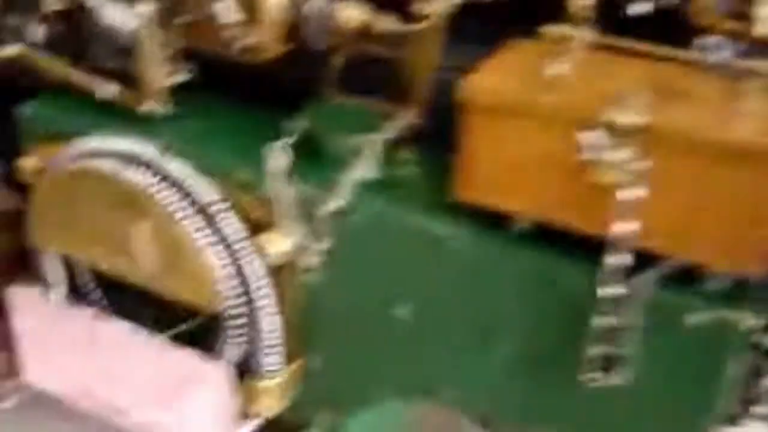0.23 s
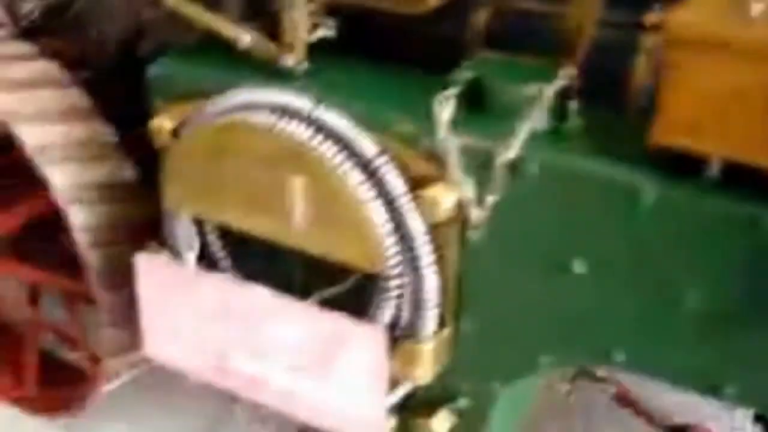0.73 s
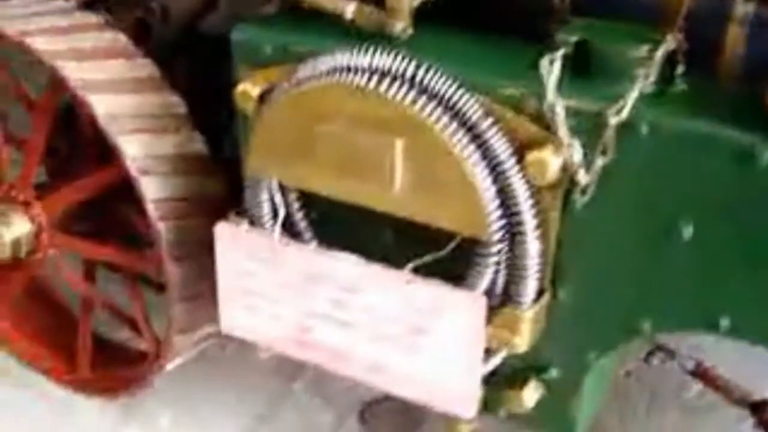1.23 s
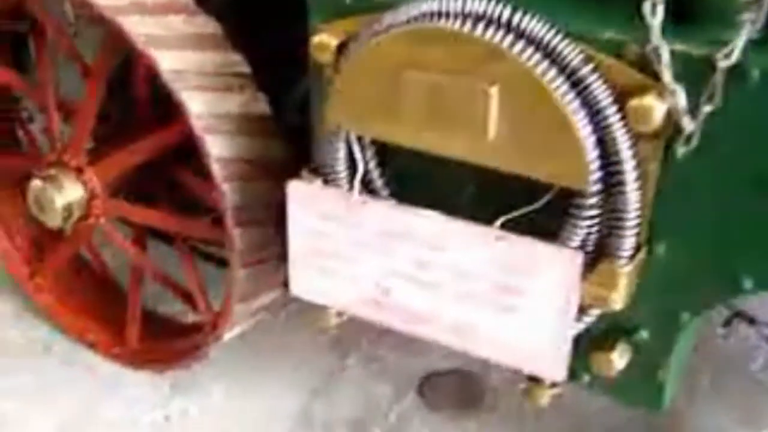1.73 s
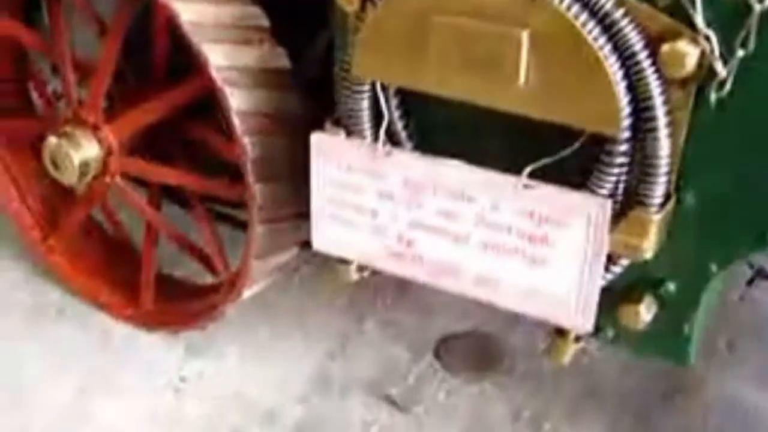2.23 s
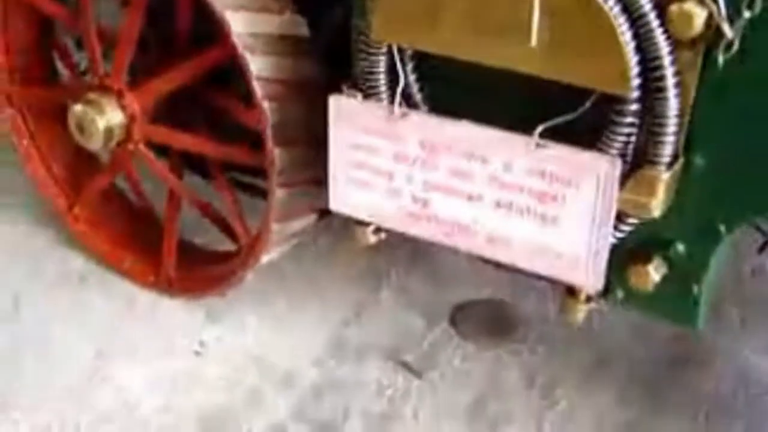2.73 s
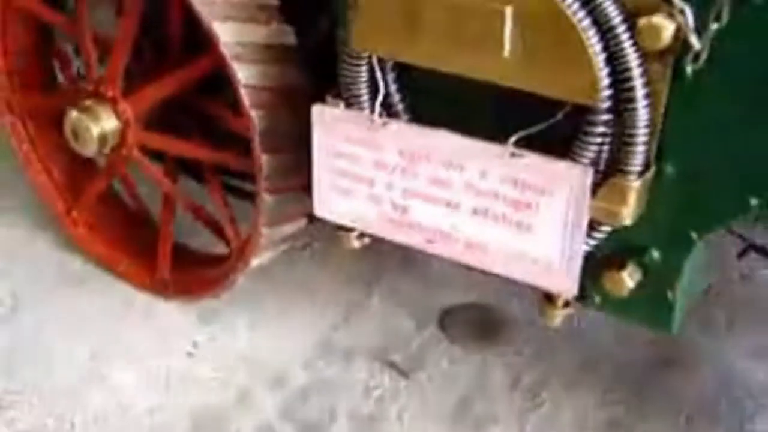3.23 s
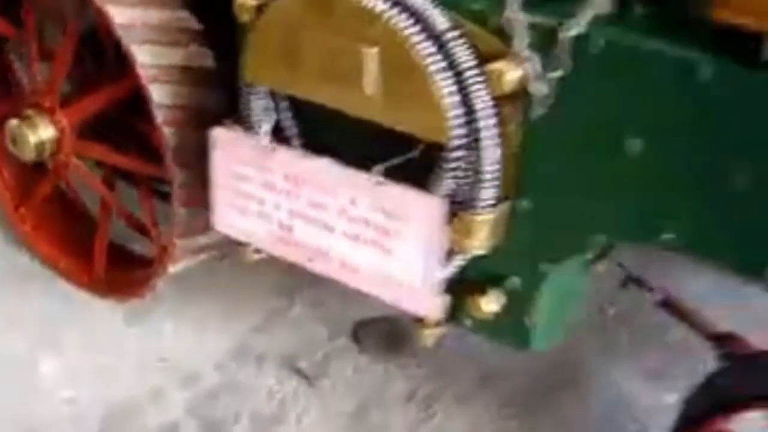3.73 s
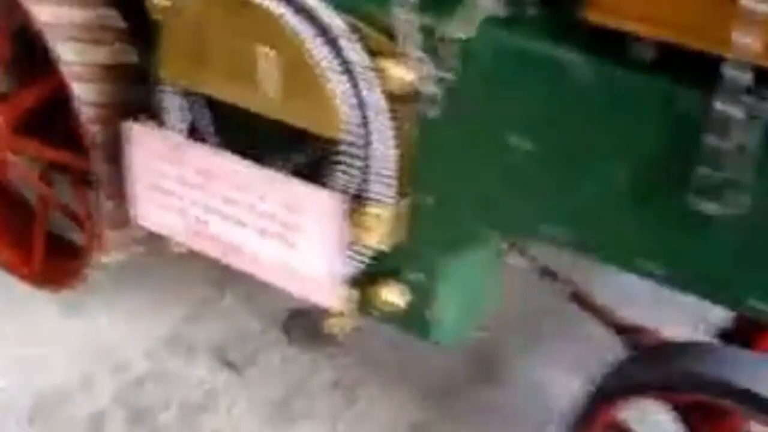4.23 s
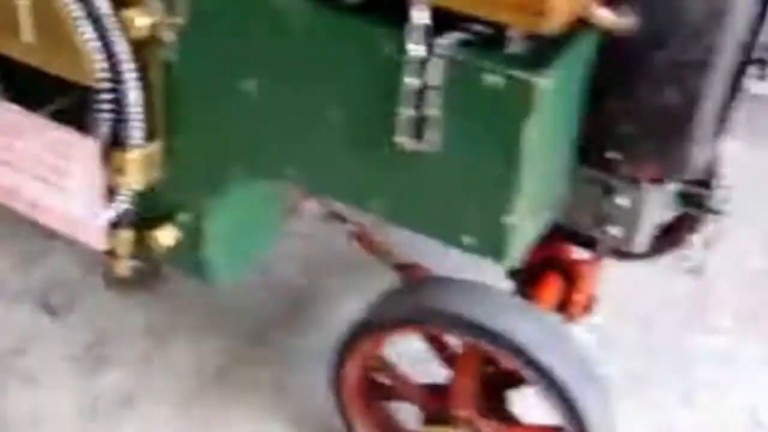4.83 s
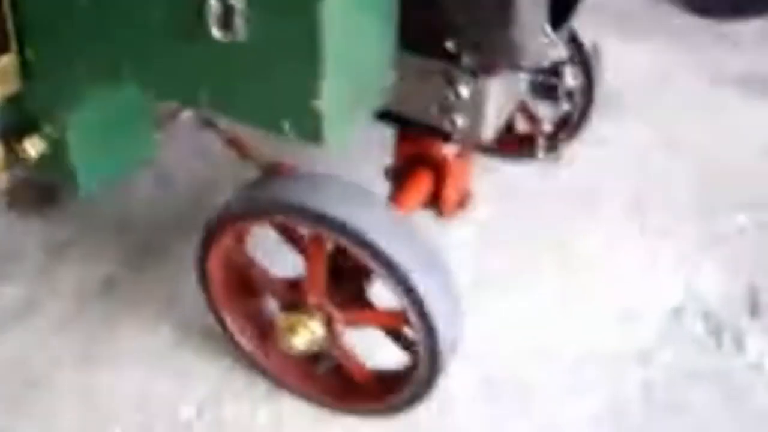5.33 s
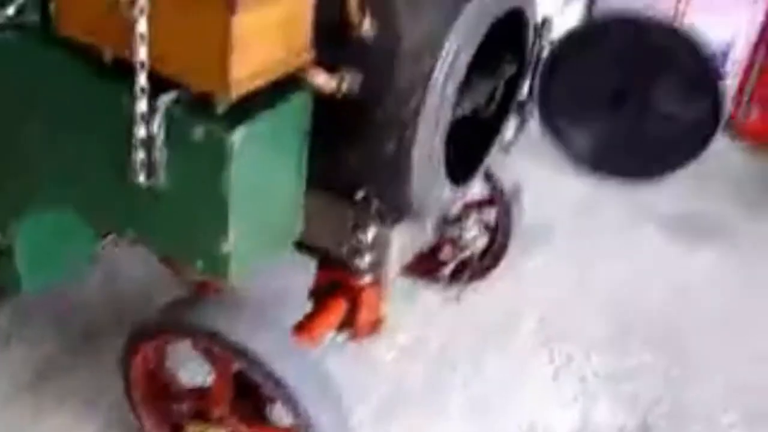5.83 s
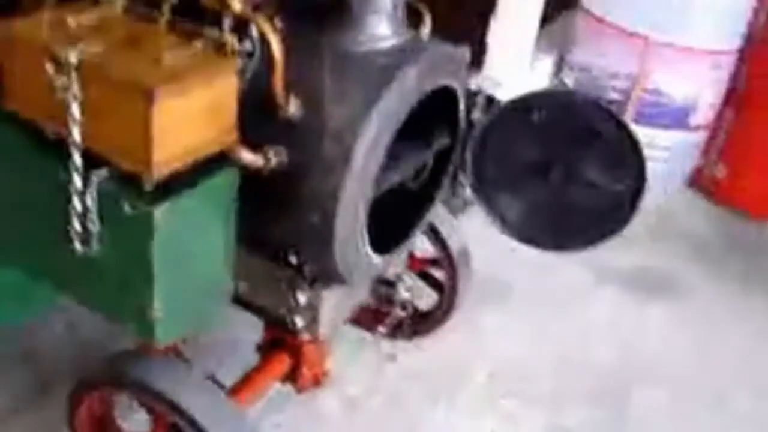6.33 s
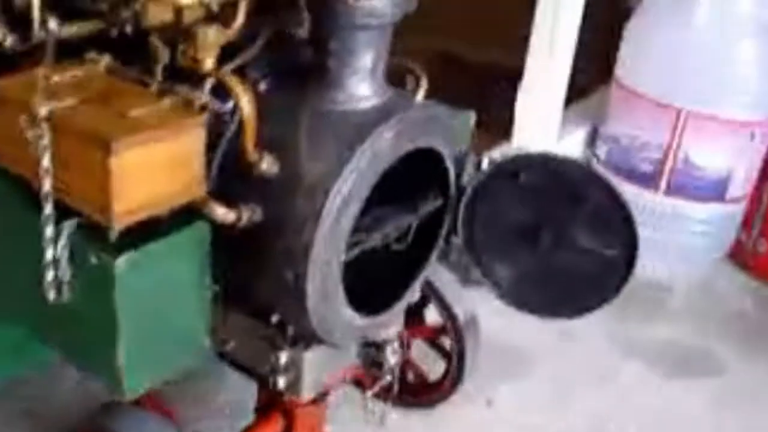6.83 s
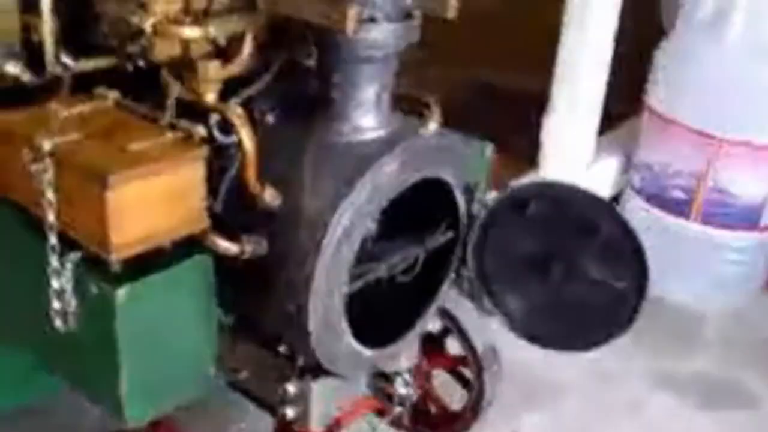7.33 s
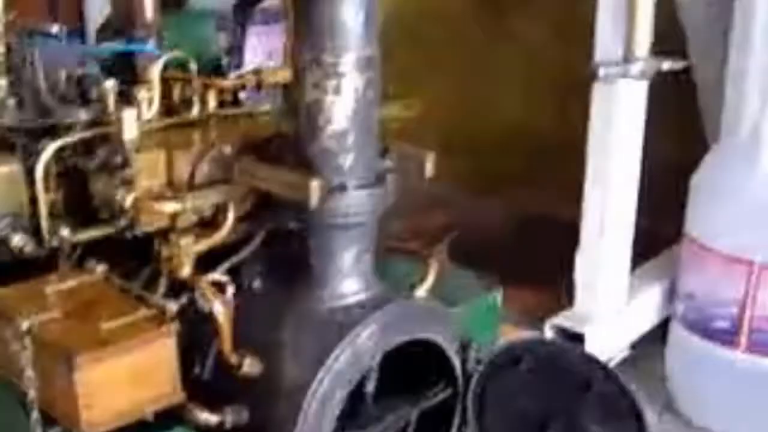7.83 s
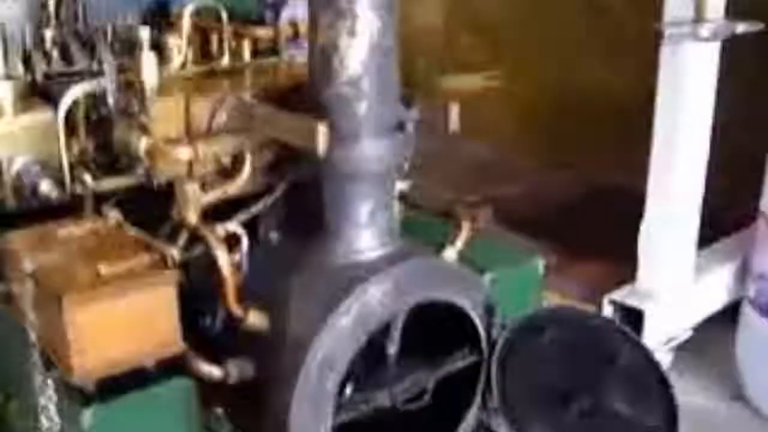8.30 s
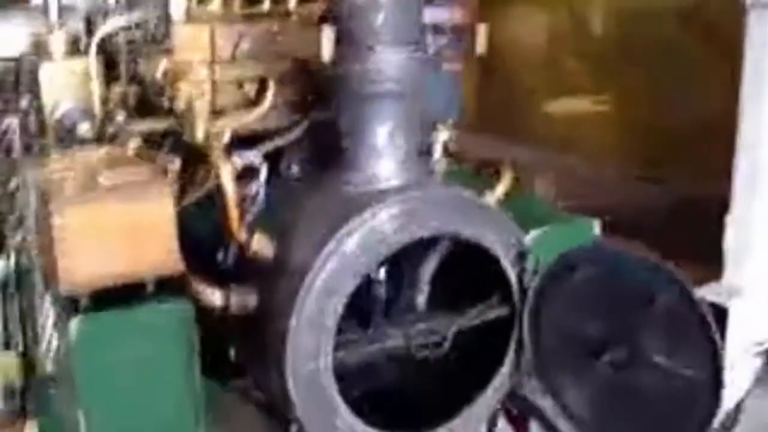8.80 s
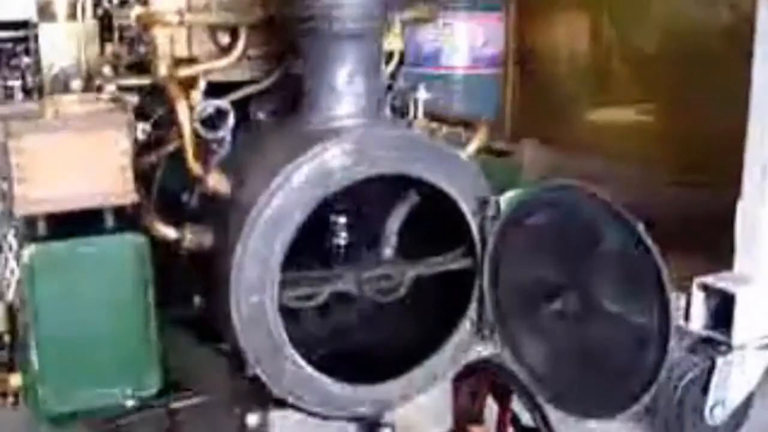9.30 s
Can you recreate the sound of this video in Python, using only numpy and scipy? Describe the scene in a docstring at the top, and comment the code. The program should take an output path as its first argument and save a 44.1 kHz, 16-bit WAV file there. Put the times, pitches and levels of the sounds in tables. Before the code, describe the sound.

From 0 to about 9.5 seconds a small model steam engine runs without stopping, close to the microphone in a small hard room. Four beats per turn, roughly twenty-six a second, easing barely slower, make a fast rattling purr: pop, hollow chuff ringing around 550 to 800 hertz, then dry metallic clack, with some beats standing out. A duller geared thud comes about once or twice a second, starting at 0, ducking everything for an instant. Thin hiss stays underneath, while a high leak sputters unevenly, stronger around 1 to 2.3, at 2.7 and 3.7, then steadier and fainter after 5. Three very short, thin, high whistles sound at 4.3, 4.4 and 4.6, the last fading. As the microphone passes, the chimney tone changes, ringing most hollow around 6.5 to 8. Echoes are short; the sound is mono and still running at the end.

```python
"""A small model steam engine runs close by in a small hard room, four exhaust beats to each crank turn.
Each beat is a valve pop, a chuff of steam noise that rings the chimney modes, and a clack of contact
noise that rings the rods. A slower geared part thuds; a thin sine whistle sounds three times; a leak
sputters as two noise peaks over a bed of shaped hiss. One microphone moves past, so the chimney's
tone shifts and the sparse room echoes change; both channels carry the same mono sound."""
import sys
import numpy as np
from scipy import signal
from scipy.fft import rfft, irfft
from scipy.io import wavfile
from scipy.ndimage import uniform_filter1d

SR = 44100
rng = np.random.default_rng(int(sys.argv[2]) if len(sys.argv) > 2 else 0)


def materialize(psi):
    """Save the field psi as 16-bit PCM at rate SR to the path in sys.argv[1].

    A 1-D psi becomes a single channel; in a 2-D psi each row is a channel.
    """
    bounded = np.clip(np.atleast_2d(psi).T, -1, 1)
    quanta = np.round(bounded * 32767).astype(np.int16)
    wavfile.write(sys.argv[1], SR, quanta)


N = 421596
T = np.arange(N) / SR

# valve openings in one turn: place [share of the turn], sign, pop_db, chuff_db, chuff_growth [dB per s],
# clack_delay_s, clack_db, clack_weight_db (added below 4 kHz), rod_ring_db
VALVE_OPENINGS = [(.17, 1, -24.5, -11.5, -0.01, 0.008, -9.5, -29, 1),
                  (.433, 0.72, -14.5, -9.5, 0.04, 0.0082, -5.5, -16, 4.5),
                  (.683, -0.7, -25.5, -12.5, -0.08, 0.0068, -8, 5.5, -2),
                  (.922, 0.46, -18, -12.5, -0.37, 0.0072, -10, 0.5, 9.5)]
# chimney and smokebox modes: pitch_hz, width_hz, level_db, lift_share, tube_share (of the mouth curves)
CHIMNEY_MODES = [(447, 87, -18, -0.9, 0.2), (550, 80.6, -4.5, 0.6, 0), (605, 29, -11.5, -1.7, 0),
                 (683.3, 45.5, 4, -0.37, 1), (763, 46, -3.5, 1.5, 0), (869, 14, -15, 1.5, 0),
                 (1271, 33, -24, -3, 0), (1333, 108, -5.5, 0.77, 0.26), (2065, 62, -23, 6, 1)]
# chimney mouth as the microphone moves past: time_s, lift_db (from facing the open mouth), tube_tone_db
MOUTH_PASS = [(0, 3.5, -4.5), (1, -3.5, -2.5), (2.5, -5.5, 0), (3.7, -4, -3), (4.5, 1.5, -7),
              (5.5, 1.5, -1.5), (6.5, 2.5, 1.5), (7.5, 2, 3.5), (8.6, 2, -0.5), (9.56, 3, -1.5)]
# beats that stand out: time_s, extra_chuff_db, extra_clack_db
BEAT_ACCENTS = [(.239, 3.5, 0), (.431, -6, 5), (.737, -2, 2.5), (.852, 5.5, -0.5), (1.011, 0, 2),
                (1.046, 3, 2.5), (1.084, 4, 2), (1.12, 1, 2), (1.933, 3.5, 1.5), (1.966, -14, 1),
                (2.432, -4, 2), (2.551, 3.5, -3), (2.895, -3, 1.5), (2.973, -2, 4.5), (3.05, 4, 1),
                (3.168, 5, -1.5), (3.358, -3, 0.5), (3.473, 2, -1), (3.554, 1, 2), (3.82, 3, 2),
                (4.054, 4, 3.5), (4.094, 3.5, 1.5), (4.209, 3, 3), (4.518, 4, -1), (4.867, 2, -3),
                (4.947, 1.5, 2), (5.292, 3.5, -3), (5.96, 3, -3), (6.115, 2, -1.5), (6.389, 4, 0),
                (6.885, 1, 1), (7.162, 1, -2), (7.318, -1, 0), (7.779, 4.5, 0), (8.017, 3, -2),
                (8.25, 2, -1), (8.717, 5, 0), (9.027, 5, -2), (9.184, 2, 0)]
# modes of the rods and frame: pitch_hz, level_db, t60_s, lift_share
ROD_MODES = [(1734, -12.5, 0.022, 0.38), (2470, -29, .03, 0.72), (2700, -19.5, 0.02, -1.6),
             (3140, -15, 0.04, -1.2), (3555, -18.5, 0.054, 0.68), (4250, -32, 0.068, -.5),
             (5120, -10.5, 0.024, 0.041), (5600, -15, .015, 0.76)]
# colour of the clack rattle: frequency_hz, level_db (per Hz)
CLACK_COLOUR = [(300, -8.5), (900, -4.5), (2300, -3.5), (3500, -8), (5000, -5.5), (8000, -8.5),
                (10000, -17), (10800, -51.5)]
# knocks of the geared part, about every five turns, often with a softer return: time_s, thud_db, clack_db
GEAR_THUDS = [(0.001, -18, 0.5), (0.487, -28, -14), (0.775, -21, -13), (1.26, -23, -15), (1.554, -18, -6),
              (2.038, -19, -27), (2.34, -16.5, -4.5), (2.808, -19, -20), (3.122, -17, -5.5),
              (3.593, -43, -18), (3.906, -20, -3.5), (4.377, -25, -17), (4.693, -17, -2.5),
              (5.475, -14, -3), (5.943, -26, -15), (6.265, -21, -21), (6.731, -22, -40), (7.056, -22, -5.5),
              (7.657, -27, -22), (7.843, -24, -7), (8.638, -17, -14), (9.422, -29, -4.5)]
# the three whistles: start_s, length_s, start_db, end_db
WHISTLES = [(4.322, .084, -16, -19), (4.419, 0.108, -22, -13), (4.56, 0.17, -13, -32)]
# strength of the steam leak: time_s, level_db
LEAK_LEVEL = [(0, -24), (.8, -26), (1, -21), (1.5, -22), (2.3, -22), (2.37, -37), (2.5, -28), (2.7, -21),
              (2.78, -31), (3.4, -31), (3.7, -19.5), (3.9, -31), (4.3, -23), (4.7, -22), (5.2, -26),
              (6, -26), (9.56, -25.5)]
# colour of the hiss: frequency_hz, level_db (per Hz)
HISS_COLOUR = [(20, -4), (100, -13.5), (190, 0.5), (380, -4.5), (700, 4), (1300, -1), (2500, -1.5),
               (5300, -2), (7000, -15.5), (7800, -8.5), (10200, -15), (10700, -37)]

# the crank starts a little fast and eases down toward its settled speed
START_TURNS, SETTLED_TURNS_PER_S, EXTRA_TURNS_PER_S, SETTLE_S = -.0858, 6.4123, .1164, 10.84
VALVE_JITTER_S = .0006
CHUFF_SPREAD_DB, CLACK_SPREAD_DB = 1.1, 0.6  # beat-to-beat chance
FRONT_SCATTER_S, FRONT_SCATTER_DB = .00035, 1.2  # the blast reaches each mode unevenly
WHISTLE_HZ, WHISTLE_EDGE_S = 6718.4, 0.0092
HISS_DB = -21
ROOM_CHANGE_S, ROOM_BASS_HZ = 2.5, 600
DIP_DB, DIP_AT_DB, DIP_S = -5.5, -13.5, 0.031  # dip depth for a thud of DIP_AT_DB, recovery
EDGE_HZ = 10900  # upper band limit


def gain_of(db):
    """Decibels to amplitude."""
    return 10 ** (np.asarray(db) / 20)


def evened(x):
    """Scales x to rms 1."""
    return x / np.sqrt(np.mean(x ** 2) + 1e-20)


def curve(rows):
    """Joins (time_s, value, ..) rows by straight lines, one curve a column."""
    s, *columns = np.transpose(rows)
    return np.squeeze([np.interp(T, s, column) for column in columns])


def coloured(x, points):
    """Shapes the spectrum of x by (frequency_hz, level_db) points joined on a log frequency scale."""
    point_hz, point_db = np.transpose(points)
    hz = np.fft.rfftfreq(len(x), 1 / SR)
    db = np.interp(np.log(hz + 1), np.log(point_hz + 1), point_db)
    return irfft(rfft(x) * gain_of(db), len(x))


def resonate(x, hz, width):
    """One decaying resonance with a peak gain of about 1."""
    r = np.exp(-np.pi * width / SR)
    return 2 * signal.lfilter([1 - r], [1, -r * np.exp(2j * np.pi * hz / SR)], x).real


def train(s, size):
    """Single samples of the given sizes at the given times."""
    places = np.clip(np.round(s * SR).astype(int), 0, N - 1)
    return np.bincount(places, size, N)


def swelling(s, db, rise, fall):
    """A rounded rise and a fall of peak db, starting at each time."""
    t = T[:round(7 * (rise + fall) * SR)]
    shape = (1 - np.exp(-(t / rise) ** 2)) * np.exp(-t / fall)
    return signal.oaconvolve(train(s, gain_of(db)), shape / shape.max())[:N]


def wander(smooth_s):
    """Smoothed chance of rms 1."""
    size = round(smooth_s * SR)
    once = uniform_filter1d(rng.standard_normal(N), size)
    return evened(uniform_filter1d(once, size))


def valve_times():
    """Times at which the slowing crank opens a valve, a little uneven, and which valve it is."""
    speed = SETTLED_TURNS_PER_S + EXTRA_TURNS_PER_S * (1 - T / SETTLE_S) ** 2
    turns = START_TURNS + np.cumsum(speed) / SR
    beat = np.arange(4 * int(turns[-1] + 1))
    angle = beat // 4 + np.array(VALVE_OPENINGS)[beat % 4, 0]
    reached = angle < turns[-1]
    beat, angle = beat[reached], angle[reached]
    s = np.interp(angle, turns, T) + VALVE_JITTER_S * rng.standard_normal(len(beat))
    return s, beat % 4


def accents(s):
    """Extra chuff and clack dB for beats at times s; most have none."""
    at, *extra_db = np.transpose(BEAT_ACCENTS)
    nearest = abs(at[:, None] - s).argmin(axis=1)
    return [np.bincount(nearest, db, len(s)) for db in extra_db]


def exhaust():
    """The pop of each valve, then the blast front and the rush of steam after it ring the chimney."""
    s, valve = valve_times()
    sign, pop_db, chuff_db, growth_db = np.array(VALVE_OPENINGS)[valve, 1:5].T
    chuff_db = chuff_db + growth_db * s + accents(s)[0]
    chuff_db = chuff_db + CHUFF_SPREAD_DB * rng.standard_normal(len(s))

    t = T[:600]
    push = np.sin(2 * np.pi * 270 * t) * np.exp(-((t - .002) / 0.0016) ** 2)
    pop_db = pop_db + 2.5 * rng.standard_normal(len(s))
    pops = signal.oaconvolve(train(s, sign * gain_of(pop_db)), push)[:N]

    rush = swelling(s + 0.0023, chuff_db - 6.5, rise=0.0028, fall=0.024)
    steam = (rush + gain_of(-28)) * rng.standard_normal(N)  # a little steam flows all the time
    lift_db, tube_db = curve(MOUTH_PASS)
    rung = np.zeros(N)
    scatter = rng.standard_normal((len(s), 2, len(CHIMNEY_MODES))).T
    for (hz, width, db, lift, tube), (late, luck) in zip(CHIMNEY_MODES, scatter):
        front_s = s + 0.00494 + FRONT_SCATTER_S * late
        front = train(front_s, gain_of(chuff_db + 24 + FRONT_SCATTER_DB * luck))
        mode = resonate(resonate(front + steam, hz, width), hz, 3.58 * width)
        rung += gain_of(db + lift * lift_db + tube * tube_db) * mode
    return pops + gain_of(16.5) * rung


def blows():
    """Time, level, weight and ring of every clack: one after each valve, one with each thud."""
    s, valve = valve_times()
    later, db, weight_db, ring_db = np.array(VALVE_OPENINGS)[valve, 5:].T
    db = db + accents(s + later)[1] + CLACK_SPREAD_DB * rng.standard_normal(len(s))
    thud_s, _, thud_clack_db = np.transpose(GEAR_THUDS)
    none = 0 * thud_s
    all_s = np.r_[s + later, thud_s + .003]
    return all_s, np.r_[db, thud_clack_db], np.r_[weight_db, none - 2.5], np.r_[ring_db, none]


def clacks():
    """Slack in the rods closes in a short rattle of contacts; the metal rings on."""
    s, db, weight_db, ring_db = blows()
    spikiness_db = 3.3 * rng.exponential(1, N).clip(0, 4)
    contacts = evened(rng.standard_normal(N) * gain_of(spikiness_db))
    ticks = np.sort(rng.random(1500)) * N / SR  # small parts chatter at random times
    loose = swelling(s - .009, db - 13.0, rise=0.02, fall=0.0092)
    rattle, ring = np.zeros((2, N))
    lift_db = curve(MOUTH_PASS)[0]

    for hz in np.geomspace(1300, 9500, num=11):
        # each blow has its own colour, and its weight acts below 4 kHz
        tint_db = 2.7 * rng.standard_normal(len(s)) + weight_db * (hz < 4000)
        sharp_s = s - .003 + 0.002 * rng.standard_normal(len(s))
        sharp = swelling(sharp_s, db + tint_db, rise=0.0027, fall=0.0031)
        tick_db = -23 + 1.5 * rng.standard_normal(len(ticks))
        chatter = swelling(ticks, tick_db, rise=0.0024, fall=0.0017)
        rattle += resonate(contacts * (sharp + loose + chatter), hz, 0.22 * hz)

    scatter = rng.standard_normal((len(s), len(ROD_MODES))).T
    for (hz, mode_db, t60, lift), luck in zip(ROD_MODES, scatter):
        blow_db = db + ring_db + mode_db + 2.6 * luck  # each blow lands elsewhere
        blow = contacts * swelling(s + 0.0026, blow_db, rise=0.0012, fall=0.0029)
        struck = blow + gain_of(mode_db) * contacts * loose
        width = np.log(1000) / np.pi / t60
        ring += resonate(struck, hz, width) * np.sqrt(t60) * gain_of(lift * lift_db)
    return gain_of(-4) * coloured(rattle, CLACK_COLOUR) + gain_of(27.0) * ring


def thuds():
    """A sudden push of pressure that sags back; no steady pressure is left."""
    s, db, _ = np.transpose(GEAR_THUDS)
    push = swelling(s, db, rise=0.0019, fall=0.016)
    return push - uniform_filter1d(push, SR // 4)


def dips():
    """A gain that sinks just after each thud, deeper for louder thuds, and comes back."""
    s, db, _ = np.transpose(GEAR_THUDS)
    depth = swelling(s + 0.0035, db - DIP_AT_DB, rise=0.0023, fall=DIP_S)
    return gain_of(DIP_DB * depth)


def whistle():
    """A thin sine of steady pitch with soft ends, its level sliding through each sounding."""
    level = np.zeros(N)
    for s, length, start_db, end_db in WHISTLES:
        ends = np.clip(np.minimum(T - s, s + length - T) / WHISTLE_EDGE_S, 0, 1)
        level += ends * gain_of(np.interp(T, [s, s + length], [start_db, end_db]))
    return np.sqrt(2) * level * np.sin(2 * np.pi * WHISTLE_HZ * T)  # the table holds rms levels


def leak():
    """A jet of steam with two broad peaks sputters, each peak in its own bursts."""
    jet = rng.standard_normal(N)
    high = resonate(resonate(jet, 6700, 670), 6700, 670) * gain_of(2.7 * wander(0.028))
    low = resonate(resonate(jet, 6290, 540), 6290, 540) * gain_of(3.1 * wander(0.032))
    sputter_db = 2.2 * wander(.01)
    return evened(high + low) * gain_of(curve(LEAK_LEVEL) + sputter_db)


def hiss():
    """Steam and bearings hiss all along: shaped noise whose level wavers a little."""
    bed = evened(coloured(rng.standard_normal(N), HISS_COLOUR))
    return bed * gain_of(HISS_DB + 2.13 * wander(0.061))


def room(x, t60):
    """Sparse taps of random sign that die away; the pattern changes slowly as the microphone moves."""
    t, wet = T[:SR // 5], np.zeros(N)
    for k in range(3):
        taps = rng.choice([-1., 1.], len(t)) * (rng.random(len(t)) < .05)
        taps = taps * (t > .004) * gain_of(-60 * t / t60)
        share = np.sqrt(2 / 3) * np.cos(np.pi * (T / ROOM_CHANGE_S + k / 3))  # total power stays even
        wet += signal.oaconvolve(x * share, taps / np.linalg.norm(taps))[:N]
    return wet - uniform_filter1d(wet, round(SR / ROOM_BASS_HZ))  # the bass hardly lingers


def scene():
    """The engine in its room with hiss, leak and whistle, all dipping after the thuds laid on top."""
    engine = exhaust() + clacks()
    echoes = gain_of(-8) * room(engine, t60=0.1)
    mono = (engine + echoes + hiss() + leak() + whistle()) * dips() + thuds()
    return np.array([mono, mono])


def record(dry):
    """The loudest peaks clip softly; then the band limit."""
    clipped = .97 * dry / (1 + abs(dry) ** 6) ** (1 / 6)
    lowpass = signal.firwin(511, EDGE_HZ, window=("kaiser", 9), fs=SR)
    return signal.oaconvolve(clipped, lowpass[None], "same")


dry = scene()
out = record(dry)
materialize(out)
```